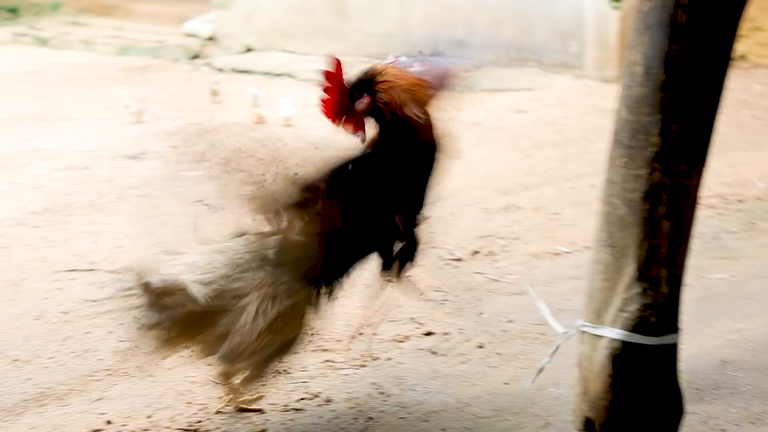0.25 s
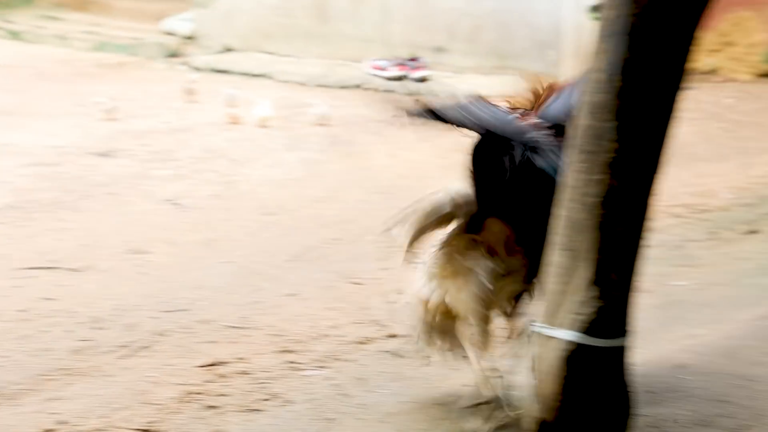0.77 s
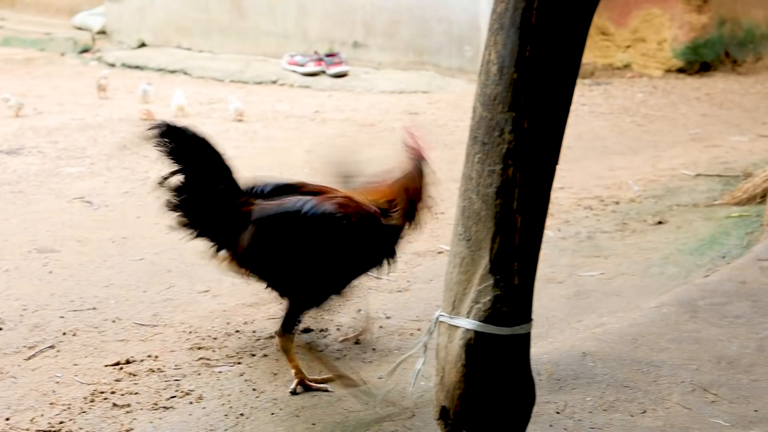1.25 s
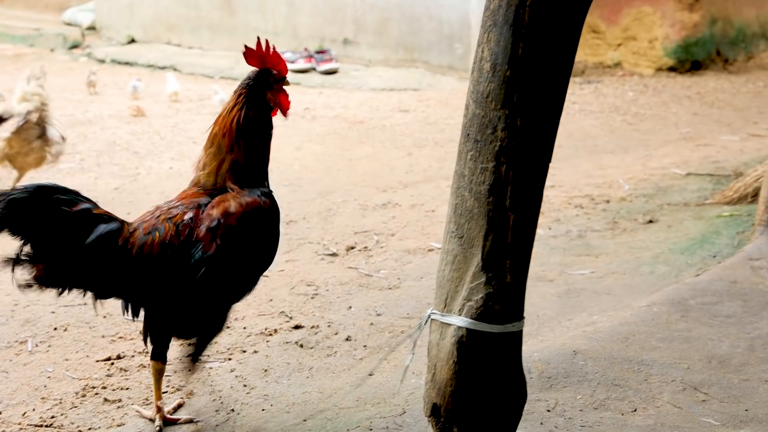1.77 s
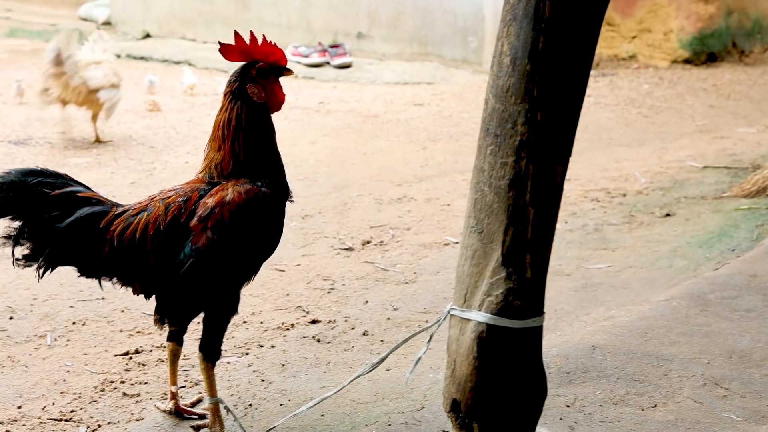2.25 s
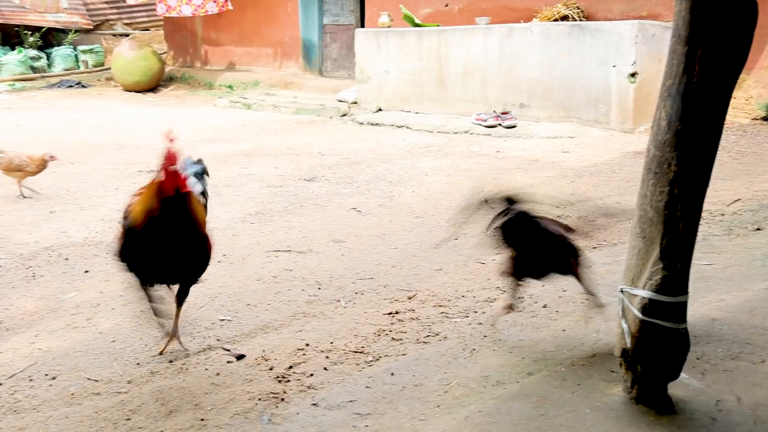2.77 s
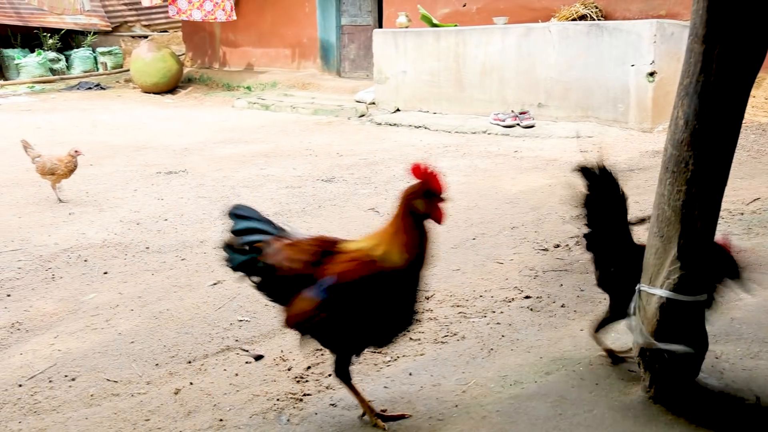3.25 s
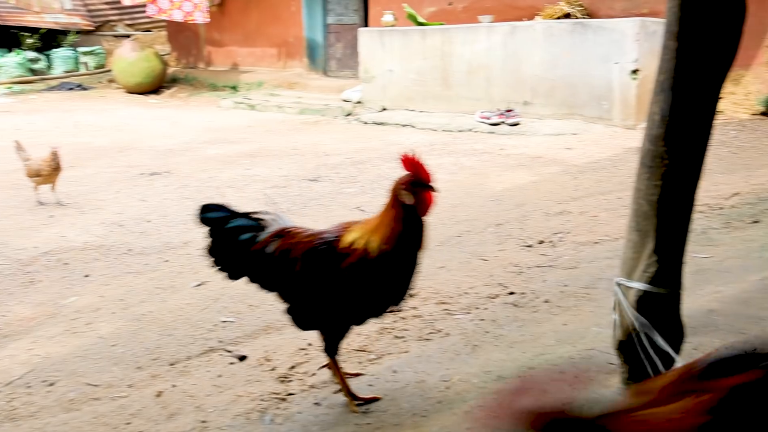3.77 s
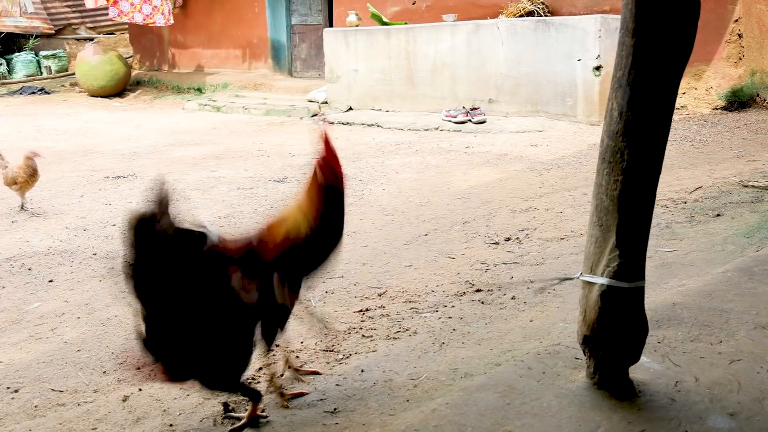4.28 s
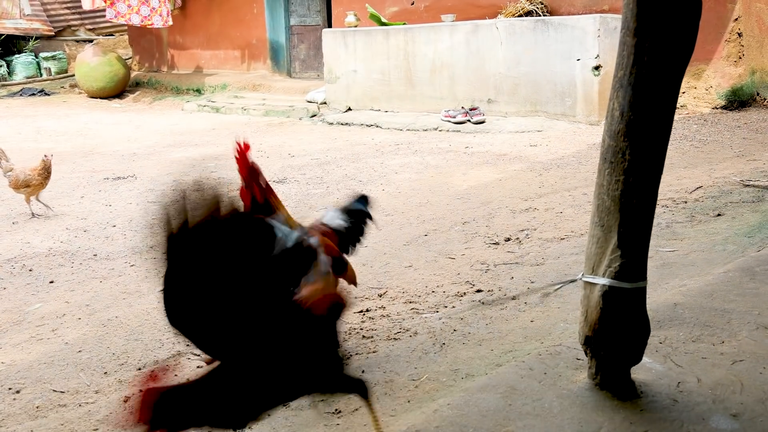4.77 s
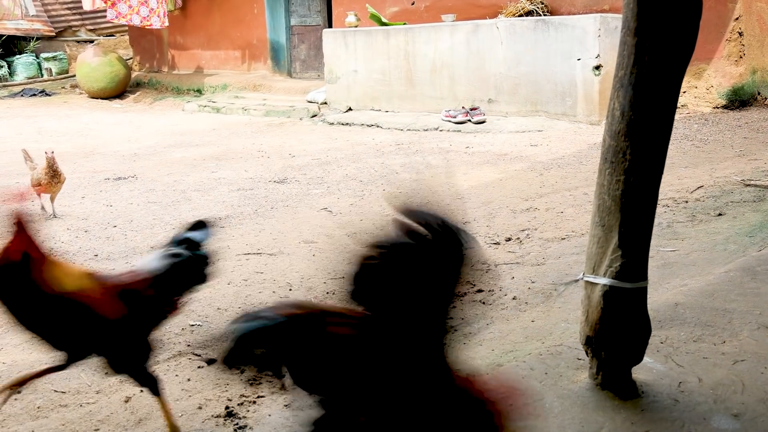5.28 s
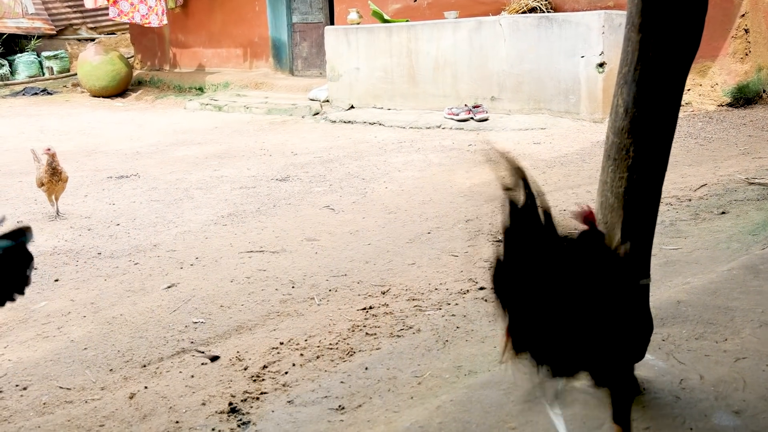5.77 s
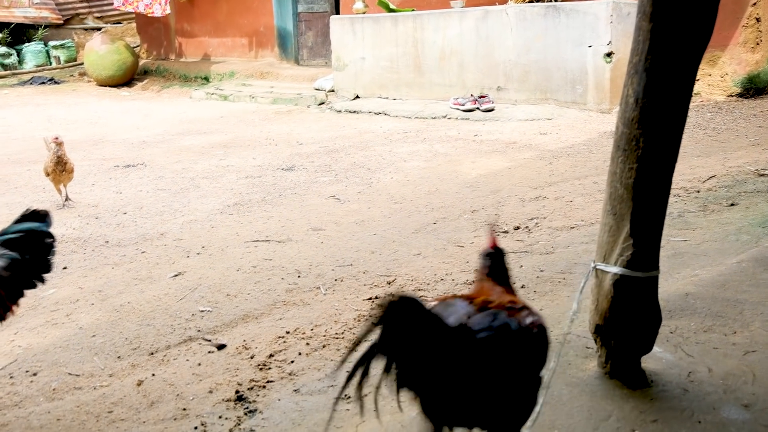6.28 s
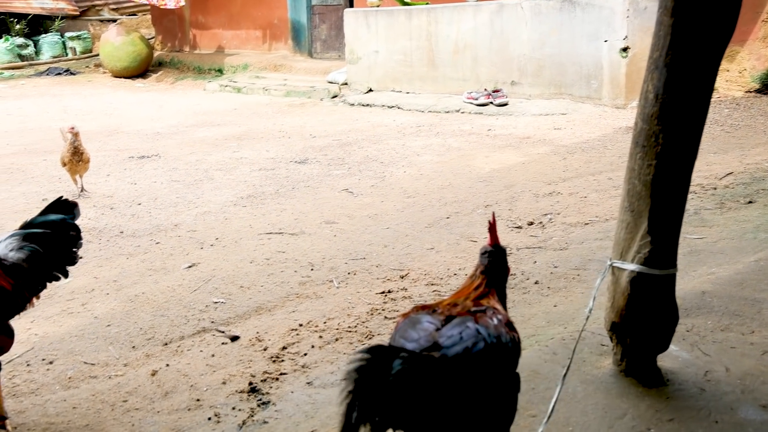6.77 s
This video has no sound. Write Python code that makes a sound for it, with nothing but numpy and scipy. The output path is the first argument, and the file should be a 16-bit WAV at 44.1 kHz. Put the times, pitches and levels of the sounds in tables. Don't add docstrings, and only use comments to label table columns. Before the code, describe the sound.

A tethered rooster flaps and rattles out a hoarse squawk, then after a cut sharper squawks and screams burst out before quiet.

```python
import sys
import numpy as np
from scipy import signal
from scipy.fft import rfft, irfft, next_fast_len
from scipy.io import wavfile
from scipy.ndimage import uniform_filter1d, map_coordinates

SR = 44100
rng = np.random.default_rng(int(sys.argv[2]) if len(sys.argv) > 2 else 0)


def makeup_ratio(level_db):
    decades = np.asarray(level_db, float) / 20
    return 10 ** decades


def generate_wav(signal):
    frames = np.transpose(np.atleast_2d(signal))
    scaled = np.clip(frames, -1, 1) * 32767
    pcm = np.round(scaled).astype(np.int16)
    wavfile.write(sys.argv[1], SR, pcm)


N = 310023
SCENE_CUT_S = 2.57


def unit(x):
    return x / np.sqrt(np.mean(x ** 2) + 1e-20)


def along(points, hz):
    f, v = np.transpose(points)
    return np.interp(np.log(hz + 1), np.log(f + 1), v)


def curves(rows, t):
    s, *cols = np.transpose(rows)
    return [np.interp(t, s, c) for c in cols]


def wobble(rate_hz, size=N, count=1):
    knots = rng.standard_normal((count, int(size * 2000 / SR) + 9))
    position = np.arange(size) * min(rate_hz, 2000) / SR
    at = np.broadcast_arrays(np.arange(count)[:, None], position)
    return map_coordinates(knots, at, order=1 if count > 1 else 3)


def filtered(x, response):
    m = next_fast_len(x.shape[-1] + 4096)
    spectrum = rfft(x, m) * response(np.fft.rfftfreq(m, 1 / SR))
    return irfft(spectrum, m)[..., :x.shape[-1]]


def rush(spectrum, alike, grain=1):
    def color(hz):
        turn = np.arccos(np.clip(along(alike, hz), -1, 1)) / 2
        return makeup_ratio(along(spectrum, hz)) * [np.cos(turn), np.sin(turn)]

    mid, side = filtered(grain * rng.standard_normal((2, N)), color)
    return unit(np.array([mid + side, mid - side]))


def add(track, s, x, pan_db, lag):
    shadow_rad = 1.43
    sides, pad = np.array([[1], [-1]]), 16

    def ports(hz):
        return np.exp(1j * shadow_rad * np.tanh(np.pi * hz * lag / SR / shadow_rad) * sides)

    x = np.pad(x, pad)
    pair = filtered(x * makeup_ratio(sides * pan_db / 2), ports)
    start = max(round(s * SR) - pad, 0)
    track[:, start:start + len(x)] += pair[:, :N - start]


def fade(t, rise, fall):
    return np.clip((t - t[0]) / rise, 0, 1) * np.clip((t[-1] - t) / fall, 0, 1)


# (time [s], level [dB])
HUM = [(0.0, -48.5), (5.44, -50.5), (5.89, -58.5), (7.03, -51)]
# (frequency [Hz], density [dB/Hz])
HUM_COLOR = [(35, -37.5), (60, -31), (207, 0), (308, -10), (371, -6), (437, -9.5), (5590, -19.5),
             (16000, -36.5)]
# (frequency [Hz], left-right likeness [0-1])
HUM_ALIKE = [(60, 1), (300, 0.99), (700, 0.4), (1500, 0.58), (3000, 0)]


def village():
    t = np.arange(N) / SR
    hum_db, = curves(HUM, t)
    hum = makeup_ratio(hum_db + 1.0 + 2.3 * wobble(24.0)) * rush(HUM_COLOR, HUM_ALIKE)
    bursts_db = 2.5 * np.sin(2 * np.pi * 9.4 * t + .8 * wobble(2))
    wingbeat_db = 3 * np.sin(2 * np.pi * 47.5 * t)
    insects = rush([(5700, -40), (6150, -6), (6550, 0.5), (6750, -15.0), (7000, -68.5)], [(30, 0.28)])
    return hum + makeup_ratio(0.55 * hum_db - 35) * makeup_ratio(bursts_db + wingbeat_db) * insects


# (time [s], level [dB])
LOW_RUSH = [(0, -46.5), (.33, -55.5), (.45, -58), (1, -41), (1.3, -37), (2, -40), (2.25, -29.5), (2.5, -40.5),
            (2.6, -59), (4.2, -58), (4.9, -71), (5.22, -49.5), (5.42, -74.5), (6.2, -63), (6.5, -56),
            (7.03, -63)]
# (frequency [Hz], density [dB/Hz])
BUFFET_COLOR = [(15, -57.5), (40, -14), (90, 0), (200, -8.5), (350, -18.5), (550, -101.5)]
# (time [s], peak [dB], frequency [Hz], left-right [dB])
LOW_THUMPS = [(0.317, -14.5, 158, 1), (0.99, -27.5, 100, 30), (1.423, -23.5, 93.5, -33),
              (1.646, -30, 82.2, -28), (2.098, -19, 146, -26), (2.104, -26, 330, -15),
              (2.163, -24, 300, -13), (2.188, -15.5, 81.5, 7), (2.31, -19, 223.5, -16),
              (1.03, -20.5, 248, 0), (3.487, -26, 186, 3.5), (3.989, -22, 220.7, 1), (5.024, -29, 263, 2),
              (5.172, -26.5, 221, 3.5), (5.213, -19.5, 397, 3)]


def wind():
    t = np.arange(N) / SR
    level_db, = curves(LOW_RUSH, t)
    alike = np.where(t < SCENE_CUT_S, 0, .8)
    gusting = makeup_ratio(4 * np.vstack([wobble(25), wobble(25)]))
    left, right = unit(gusting * rush(BUFFET_COLOR, [(30, 0)]))
    right = alike * left + np.sqrt(1 - alike ** 2) * right
    out = makeup_ratio(level_db + 3.0) * np.array([left * makeup_ratio(-2), right * makeup_ratio(2)])
    for s, db, hz, pan_db in LOW_THUMPS:
        u = np.arange(-1.5, 1.5, hz / SR)
        pop = -makeup_ratio(db - 3.0) * np.cos(2 * np.pi * u) * np.exp(-(u / 0.5) ** 2)
        add(out, s - 0.44 / hz, pop, pan_db, 0)
    return out


# (delay [s], left [dB], right [dB])
WALL_SLAPS = [(.006, -11, -8.5), (.017, -16, -22.5), (0.026, -20.5, -29.5), (0.045, -22.5, -32),
              (.058, -39.5, -29), (0.082, -33.5, -42.5)]
# (frequency [Hz], decay by 60 dB [s])
TAIL_DECAY = [(300, 0.77), (2000, 0.28), (8000, 0.1)]


def yard(x):
    hz, t, z = signal.stft(rng.standard_normal((2, SR // 2)), SR, nperseg=256)
    decay = makeup_ratio(-60 * t / along(TAIL_DECAY, hz)[:, None])
    tail = signal.istft(z * decay, SR, nperseg=256)[1]
    answer = makeup_ratio(-18.5) * np.pad(tail / np.linalg.norm(tail[0]), ((0, 0), (300, 0)))
    skews_s = rng.uniform(-0.0013, 0.001388, len(WALL_SLAPS))
    for (delay, *db), skew in zip(WALL_SLAPS, skews_s):
        at = [round((delay + skew) * SR), round((delay - skew) * SR)]
        answer[[0, 1], at] += makeup_ratio(np.array(db))
    return signal.fftconvolve(x, answer, axes=1)[:, :N]


# (time [s], length [s], start pitch [Hz], level [dB])
CHICK_PEEPS = [
    (0.085, 0.091, 4640, -41.5),
    (0.401, 0.098, 4650, -39.5),
    (0.682, 0.084, 4612, -39),
    (1.033, .1, 4586, -40),
    (2.52, 0.052, 4500, -49),
]
# (time [s], length [s], start pitch [Hz], end pitch [Hz], level [dB])
FAR_SLIDES = [(1.48, 0.059, 4940, 3650, -49.5), (1.748, 0.045, 4780, 3700, -51),
              (0.634, .06, 4150, 3300, -51), (1.654, 0.042, 3950, 3500, -54),
              (2.1, 0.055, 4730, 3810, -54.5), (2.364, 0.037, 3800, 3225, -52),
              (2.47, 0.075, 4700, 3700, -57), (4.335, 0.06, 3830, 3300, -56), (2.8, .04, 6200, 4600, -56),
              (2.805, .05, 4300, 3300, -52), (1.9, 0.043, 4250, 4000, -56),
              (1.947, 0.03, 3540, 2860, -49.5), (2.24, .04, 4300, 4200, -61),
              (2.27, 0.027, 3500, 2800, -46), (6.14, 0.1, 7510, 5400, -64)]


def chicks():
    out = np.zeros((2, N))
    peep_held, slide_held, peep_drop = 0.48, 0.042, 0.61
    calls = [(s, length, hz, peep_drop * hz, db, peep_held) for s, length, hz, db in CHICK_PEEPS]
    calls += [(*row, slide_held) for row in FAR_SLIDES]
    for s, length, start_hz, end_hz, db, held in calls:
        u = np.arange(0, length, 1 / SR) / length
        drop = np.clip((u - held) / (1.001 - held), 0, 1)
        hz = start_hz + (end_hz - start_hz) * (1 - (1 - drop ** 1.5) ** 1.9)
        hz -= (400 * np.exp(-u / 0.09) + 1000 * u ** 2 * (1 - drop)) * held
        phase = 2 * np.pi * np.cumsum(hz * (1 + .011 * wobble(300, size=len(u))[0])) / SR
        tone = np.sin(phase) + .06 * drop * np.sin(2 * phase)
        level_db = db + 2 * wobble(120, size=len(u))[0] + 17 * held * drop
        level_db -= 26 * held * np.exp(-((drop - .33) / .22) ** 2)
        add(out, s, tone * makeup_ratio(level_db) * fade(u, .12, .25), 1, 0.5)
    return out


# (time [s], peak [dB])
CLAW_TICKS = [(0.3275, -21.5), (0.3734, -32), (.0747, -45), (.1565, -45.5), (.8165, -35.5), (.8764, -44.5),
              (.9792, -40.5), (1.03, -42.5), (1.519, -43.5), (1.925, -42.5), (2.1929, -50.5),
              (2.8794, -29.5), (3.9878, -27), (4.1955, -32.5), (2.335, -59), (2.2696, -15.5), (2.5721, -25),
              (2.6902, -29.5), (2.7386, -22), (2.872, -26), (3.5787, -13), (4.1174, -35), (4.1867, -25.5),
              (4.536, -43), (4.7411, -19), (5.8964, -57), (6.3765, -52)]


def ticks():
    out, t = np.zeros((2, N)), np.arange(SR // 20) / SR
    dirt = signal.butter(1, [300, 1800], "bandpass", fs=SR)
    for (s, db), (pan, lag) in zip(CLAW_TICKS, rng.standard_normal((len(CLAW_TICKS), 2))):
        crack, knock = rng.standard_normal((2, len(t)))
        crack = (crack - uniform_filter1d(crack, size=12)) * makeup_ratio(db + 6.5 - 60 * t / 0.0014)
        knock = signal.lfilter(*dirt, knock) * makeup_ratio(0.57 * db - 2.5 - 60 * t / 0.021)
        add(out, s, crack + knock, 2 * pan, 3 * lag)
    return out


# (time [s], length [s], level [dB])
FOOT_SCUFFS = [
    (0.274, 0.21, -39.5),
    (0.46, 0.092, -35),
    (0.567, 0.082, -38.5),
    (0.689, 0.27, -45.5),
    (2.568, 0.044, -38.5),
    (2.871, 0.13, -37),
    (3.229, 0.051, -31.5),
    (4.046, 0.126, -42),
    (4.193, 0.0098, -26),
    (4.532, 0.19, -39),
    (6.368, 0.4, -54),
]


def scuffs():
    grit_hz, thud_hz = 940, 220

    def ground(f):
        roll_db = -5 * np.log2((f + 1) / grit_hz) ** 2
        thud_db = 2.0 - 10.7 * np.log2((f + 1) / thud_hz) ** 2
        return makeup_ratio(roll_db) + makeup_ratio(thud_db)

    out = np.zeros((2, N))
    for s, length, db in FOOT_SCUFFS:
        t = np.arange(0, length, 1 / SR)
        grit = rng.standard_normal(len(t)) * makeup_ratio(5.2 * wobble(300, size=len(t))[0])
        drag = unit(filtered(grit, ground)) * makeup_ratio(db)
        add(out, s, drag * fade(t, 0.0024, 0.62 * length), 0, 2)
    return out


# (middle [s], half width [s], level above 7 kHz [dB])
WING_STROKES = [(0.322, 0.069, -51.5), (0.494, 0.024, -42), (0.587, 0.027, -41.5), (0.731, 0.031, -43.5),
                (.6, 0.44, -55), (.842, 0.035, -56), (1.421, 0.061, -51), (2.601, 0.035, -57),
                (2.684, 0.016, -50), (2.7, 0.32, -54), (2.76, 0.062, -52.5), (2.922, 0.041, -47),
                (3.02, 0.075, -61.5), (3.32, 0.062, -44.5), (3.398, 0.033, -39.5), (3.521, 0.036, -37.5),
                (3.575, 0.012, -35.5), (3.731, 0.0087, -44.5), (3.862, 0.092, -51), (4.009, 0.026, -37.5),
                (4.1, 0.049, -49.5), (4.201, 0.026, -51), (4.298, 0.021, -41.5), (4.4, 0.073, -51.5),
                (4.569, 0.065, -52), (4.945, 0.011, -51.5), (5.207, 0.0086, -43.5), (5.531, 0.023, -50),
                (5.181, 0.033, -55.5), (6.41, 0.14, -60), (6.75, 0.14, -65.5)]
# (frequency [Hz], density [dB/Hz])
FEATHER_COLOR = [(180, -24.5), (300, 9), (502, -11), (1120, 5), (1720, -0.5), (2740, 3), (8790, -7),
                 (16000, -9.5)]


def wings(voice):
    t = np.arange(N) / SR
    breath_db, breath_s = -32.5, 0.031
    strokes = makeup_ratio(breath_db) * uniform_filter1d(np.abs(voice).mean(0), size=int(breath_s * SR))
    for s, width, db in WING_STROKES:
        same_scene = (t > SCENE_CUT_S) == (s > SCENE_CUT_S)
        strokes += makeup_ratio(db) * np.exp(-((t - s) / width) ** 2) * same_scene
    grain = makeup_ratio(3.2 * wobble(700) + 1.3 * wobble(90))
    noise = rush(FEATHER_COLOR, [(300, 1.0), (2000, 0.1), (5000, 0.074)], grain)
    top = filtered(noise, lambda hz: hz > 7200)
    return strokes * noise / np.std(top) * makeup_ratio([[-1], [1.5]])


# (frequency [Hz], gain [dB])
THROAT_GAIN = [(200, -9), (380, 3), (1100, 2), (2500, -5.5), (4200, -10), (6000, -17), (8000, -18.5),
               (11000, -22.5)]


def note(rows, throb, upper_db, under_db, ring_hz, ring_db):
    t = np.arange(rows[0][0], rows[-1][0], 1 / SR)
    size = len(t)
    level_db, pitch, mouth, rough, pipe_db = curves(rows, t)
    jitter = (.005 + .065 * np.clip(rough, 0, 1)) * wobble(150, size=size)[0]
    turns = np.cumsum(pitch * (1 + jitter)) / SR
    k = np.arange(1, 2 * 9500 // min(pitch))[:, None] / 2
    hz, whole = k * pitch, k % 1 == 0
    effort_db = 0.22 * (level_db + 6.0) * np.clip(np.log2(hz / 3000), 0, 1)
    source = makeup_ratio(-2.5 * np.log2(k + 1) + effort_db)
    rough = np.clip(rough * (1 + .12 * k) + .008 * k, 0, 1)
    # (multiple, dB)
    modes = [(1, 14.0), (1.5, 1.5), (2, 1.8), (3, 2.5)]
    beak = makeup_ratio(ring_db - 4 * (np.log2(hz / ring_hz) / 0.17) ** 2)
    for m, db in modes:
        beak = beak + makeup_ratio(db + upper_db * (m > 1) - 3 * ((hz / mouth - m) / (.11 + .06 * rough)) ** 2)
    windpipe = makeup_ratio(pipe_db - 3.9 * (np.log2(hz / 740) / 0.15) ** 2)
    leak = makeup_ratio(-8 + under_db * (hz < .8 * mouth))
    gain = source * makeup_ratio(along(THROAT_GAIN, hz)) * (beak + windpipe + leak)
    steady = np.sqrt(1 - rough) * whole * makeup_ratio(2.8 * wobble(45, size=size, count=len(k)))
    chaos = wobble(450, size=size, count=len(k)) + 1j * wobble(450, size=size, count=len(k))
    chaos *= np.sqrt(rough) * np.where(whole, .7, .75 * np.sqrt(rough)) * np.where(k < 1, .1, 1)
    lines = gain * (steady + chaos) * np.exp(2j * np.pi * k * turns)
    power = (gain ** 2 * (steady ** 2 + rough * .5)).sum(0) / 2
    buzz = lines.imag.sum(0) / np.sqrt(power)
    flap = np.cos(2 * np.pi * 59.7 * (t - 1.31) + .4 * wobble(25.31, size=size)[0])
    chop = makeup_ratio(curves(throb, t)[0] * (flap - .9))
    return buzz * chop * makeup_ratio(level_db) * fade(t, 0.0025, 0.001)


CHUCKLE_HZ = 389.1
# first bird [dB], second bird [dB]
UPPER_DB = (-3.5, -2.5)
# first bird [dB], second bird [dB]
ONSET_DB = (-6.5, -20)
# (frequency [Hz], level [dB])
THROAT_RINGS = [(3100, -0.5), (5900, 2.5)]


def cluck(s, length, db, pitch, mouth, rough, under_db, sudden=False):
    bird = int(s > SCENE_CUT_S)
    # (share of length, dB, pitch factor)
    shape = [(0, ONSET_DB[bird], .95), (.3, -3, .99), (.55, 3, 1.01), (.8, 1.5, 1), (1, -8, .95),
             (1.4, -21, 0.83)]
    if sudden:
        shape = [(0, -7.5, .97), (.2, 2, 1.01), (.7, 0.5, 0.98), (1, -9.5, .92), (1.4, -21.5, 0.83)]
    pipe_db = 16 - 13.5 * abs(np.log2(pitch / CHUCKLE_HZ * mouth / 850))
    rows = [(s + u * length, db + swell_db, pitch * bend, mouth, rough, pipe_db)
            for u, swell_db, bend in shape]
    return note(rows, [(0, 0.014)], UPPER_DB[bird], under_db, *THROAT_RINGS[bird])


def squawk(rows, rest_hz, rise, gape, pipe_db, throb_db, *timbre):
    top_s, _, top_hz, _ = max(rows, key=lambda row: row[2])
    throb, path = [], []
    for s, db, pitch, rough in rows:
        falling = s > top_s
        slack_db = throb_db * (1 - pitch / top_hz) * (1 if falling else 0.75)
        throb.append((s, slack_db))
        mouth = rest_hz + rise * pitch + gape * (s - rows[0][0])
        path.append((s, db, pitch, mouth, rough, pipe_db + 2.2 * slack_db * falling))
    return note(path, throb, *timbre)


# (time [s], level [dB], pitch [Hz], roughness [0-1])
RATTLE_SQUAWK = [(1, -46, 500, .9), (1.04, -37, 540, .6), (1.047, -23, 570, .4), (1.085, -22, 660, .4),
                 (1.118, -24, 879.4, .6), (1.195, -23, 840, .55), (1.25, -19.5, 690, .55),
                 (1.405, -21.5, 650, .5), (1.436, -29, 640, .7)]
# (time [s], level [dB], pitch [Hz], roughness [0-1])
ALARM_SQUAWKS = [
    [(3.062, -34, 578, .8), (3.072, -24, 596, .6), (3.095, -23, 612, .1), (3.13, -22, 624, .1),
     (3.14, -23, 400, .1), (3.165, -24, 372, .25), (3.19, -21, 402, .12), (3.21, -28, 396, .15),
     (3.236, -40, 390, .1)],
    [(3.275, -31, 650, .45), (3.305, -22, 747, .25), (3.317, -28, 745, .15), (3.348, -23, 767, .08),
     (3.352, -21, 1130, .15), (3.37, -16, 1075, .06), (3.388, -19, 960, .25), (3.4, -9, 800, .7),
     (3.43, -37.5, 705, .8)],
    [(3.492, -30, 596, .14), (3.505, -19, 780, .12), (3.515, -20, 808, .25), (3.532, -25, 800, .5)],
    [(3.528, -24, 775, .5), (3.545, -16, 745, .2), (3.552, -19, 735, .3)],
    [(3.548, -18, 760, .2), (3.556, -12, 742, .08), (3.568, -11, 725, .06), (3.575, -22, 700, .2)],
    [(3.562, -22, 570, .3), (3.57, -15, 555, .15), (3.58, -12, 515, .25), (3.588, -17, 495, .3),
     (3.6, -36, 490, .33)],
]
# (time [s], level [dB], pitch [Hz], roughness [0-1])
SCREAM_SQUAWKS = [
    [(4.59, -41.5, 697, .6), (4.625, -16.5, 846, .36), (4.676, -15, 850, .22), (4.682, -14, 1025, .35),
     (4.7, -21, 1054, .6), (4.708, -14.5, 1140, .35), (4.74, -10.5, 1240, .55), (4.745, -14, 844, .3),
     (4.778, -31, 800, .8)],
    [(5.19, -37, 857.4, 0.45), (5.205, -15, 930, 0.43), (5.265, -14, 1018, 0.6), (5.281, -10, 1150, .7)],
    [(5.279, -14.5, 1366, .25), (5.292, -8.5, 1490, .2), (5.296, -10, 1320, .1), (5.317, -13.5, 1400, .14),
     (5.324, -16.5, 1510, .3), (5.328, -9.5, 1410, .1), (5.346, -14.5, 1370, .16)],
    [(5.345, -9, 703.7, 0.1), (5.367, -13, 672, 0.03), (5.382, -27, 545.5, 0.133)],
]
# (resting mouth [Hz], rise [Hz/Hz], gape [Hz/s], windpipe [dB], throb [dB])
SQUAWK_POSTURES = [(55.52, 1.78, 1.4, -1, 21.5), (1880, 0.41, 100, 10, -4), (2350, .9, 1, -10, .3),
                   (2300, .3, 1, 12, 3), (1500, 1.01, 1, -20, 3), (2150, 1.01, 1, -30, .3),
                   (1190, .95, 1, -14, .3), (453, 1.65, 110, 6.5, -4.5), (192, 2.21, 110, 18.5, 19.5),
                   (793, 1.83, 100, -7.5, 7), (500.5, 2.28, 103.5, -47, 4)]
# (upper beak [dB], below mouth resonance [dB], throat resonance [Hz], its level [dB])
SQUAWK_TIMBRES = [(-2, -4, 3870, 5), (-5, 3, 1540, 9.5), (-17, 1, 1450, -4.5), (4, -3, 1700, 6.5),
                  (-0.5, -17, 2500, 13), (-13, -10, 2700, 8), (6.5, -3, 2600, 15.5), (5, 8, 3000, 1.5),
                  (3, 5, 1880, 5.5), (-3.5, -1.5, 5800, 3.5), (0.5, -6.5, 5600, 2)]
# (time [s], length [s], level [dB], pitch [Hz], mouth resonance [Hz])
CLEAR_CLUCKS = [
    (.139, 0.12, -48.5, 502, 500),
    (1.597, 0.029, -23, 408.4, 1110),
    (1.683, 0.029, -19.5, 442.5, 1255),
    (2.496, 0.023, -20.5, 416, 1300),
    (3.707, 0.047, -23, 373.8, 1880),
    (3.944, 0.03, -22.5, 433, 1290),
    (4.875, 0.025, -13, 535.3, 1682),
    (5.041, 0.032, -19, 553.5, 1556),
    (5.672, 0.057, -51.5, 371, 1150),
    (5.711, 0.045, -27, 366, 1555),
]
# (time [s], length [s], level [dB], mouth resonance [Hz])
HOARSE_CHUCKLES = [(1.549, 0.019, -32.5, 880), (1.576, 0.019, -23, 940), (1.63, 0.021, -36, 850),
                   (1.878, 0.022, -28, 810), (1.905, 0.012, -28, 830), (2.127, 0.023, -34, 848),
                   (2.158, .01, -28, 810), (2.243, 0.021, -22, 1385), (2.322, 0.017, -32.5, 1200),
                   (2.385, 0.029, -31.5, 850), (2.419, .012, -33, 850), (3.976, 0.018, -25.5, 1290),
                   (4.008, 0.0077, -30, 1214), (5.499, 0.02, -34, 1407), (5.518, .03, -23, 1730),
                   (6.457, 0.054, -43.5, 1170)]
# (time [s], lag of right port [samples], left-right [dB])
BIRD_BEARING = [(0, 9, -3), (1.3, 1, 1), (1.7, 2, 0), (1.9, 13, 0.5), (2.15, 9, 0), (2.25, -4, -1),
                (3.6, -6.5, -1), (4.6, 3.5, 0), (5.3, 2.5, 0), (5.34, 1.5, -1), (6.46, 12, 2.5)]


def fowl():
    calls = []
    squawks = [RATTLE_SQUAWK, *ALARM_SQUAWKS, *SCREAM_SQUAWKS]
    for rows, posture, timbre in zip(squawks, SQUAWK_POSTURES, SQUAWK_TIMBRES):
        calls.append((rows[0][0], squawk(rows, *posture, *timbre)))
    for s, length, db, pitch, mouth in CLEAR_CLUCKS:
        rough = .27 if s > 5 else .1
        chest_db = 3.5 - 12.5 * np.log2(pitch / CHUCKLE_HZ)
        calls.append((s, cluck(s, length, db, pitch, mouth, rough, chest_db)))
    for s, length, db, mouth in HOARSE_CHUCKLES:
        calls.append((s, cluck(s, length, db, CHUCKLE_HZ, mouth, rough=.65, under_db=-3, sudden=True)))
    out = np.zeros((2, N))
    for s, sound in calls:
        lag, pan_db = curves(BIRD_BEARING, s)
        add(out, s, sound, pan_db, lag)
    return out


def scene():
    voice = fowl()
    near, far = voice + ticks() + scuffs(), chicks()
    step = 1 / (.25 * SR)
    loud = signal.lfilter([step], [1, step - 1], np.abs(near).mean(0))
    air = village() / (1 + loud / 0.085)
    return near + far + yard(near + makeup_ratio(17.5) * far) + wings(voice) + wind() + air


def low_pass(x):
    return signal.sosfilt(signal.butter(12, 15900, fs=SR, output="sos"), x)


def record(dry):
    mix = dry / (1 + np.abs(dry) ** 8) ** (1 / 8)
    return low_pass(mix)


dry = scene()
out = record(dry)
generate_wav(out)
```